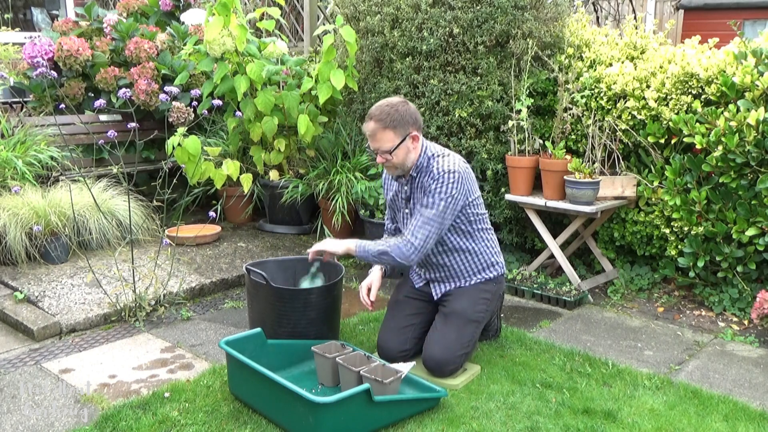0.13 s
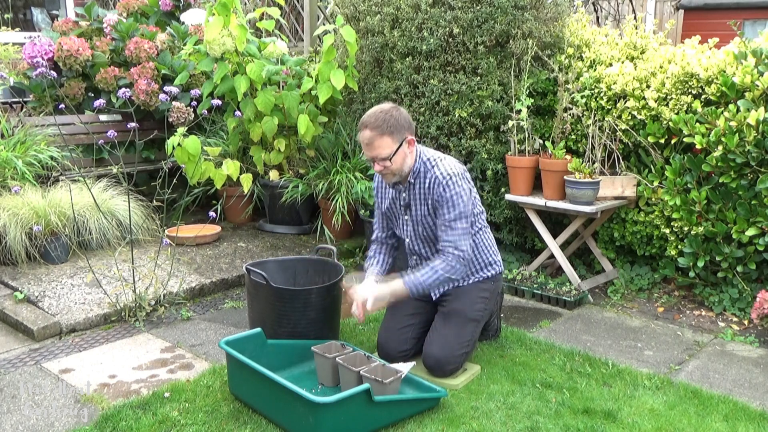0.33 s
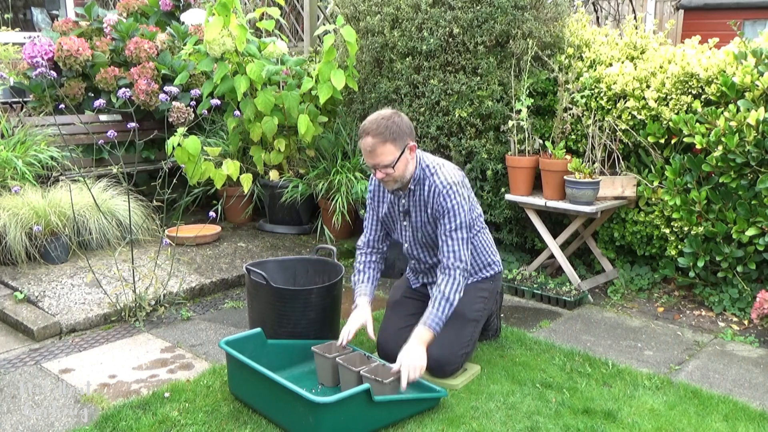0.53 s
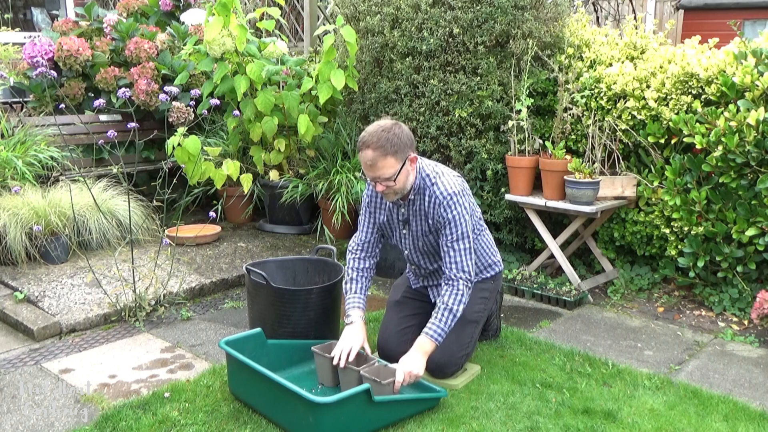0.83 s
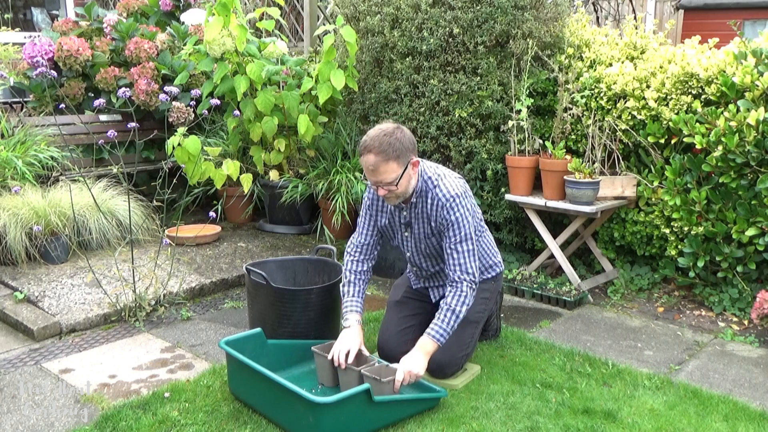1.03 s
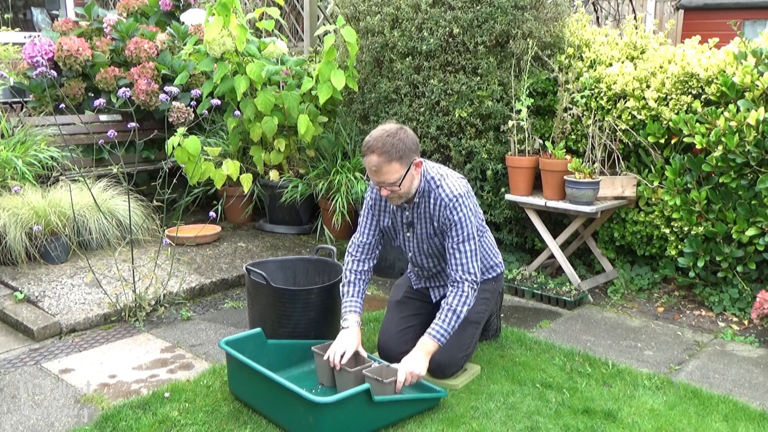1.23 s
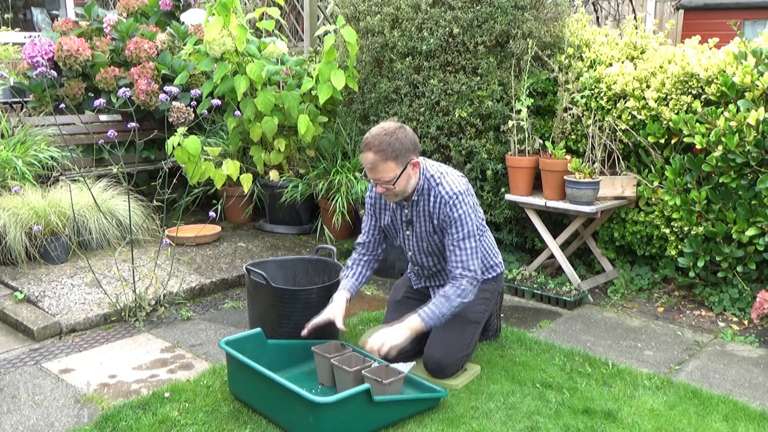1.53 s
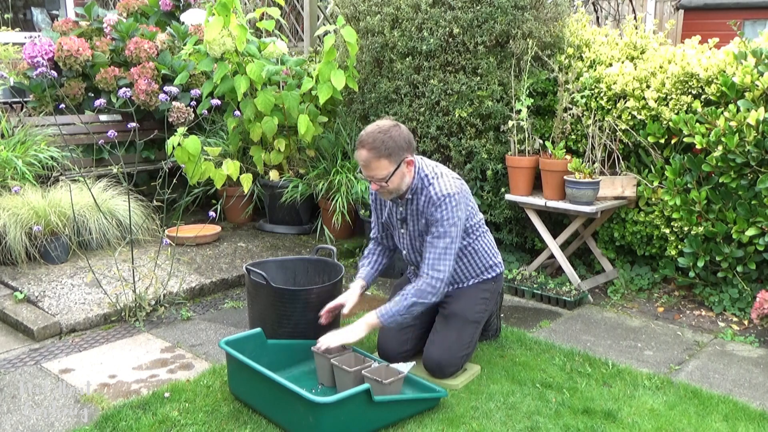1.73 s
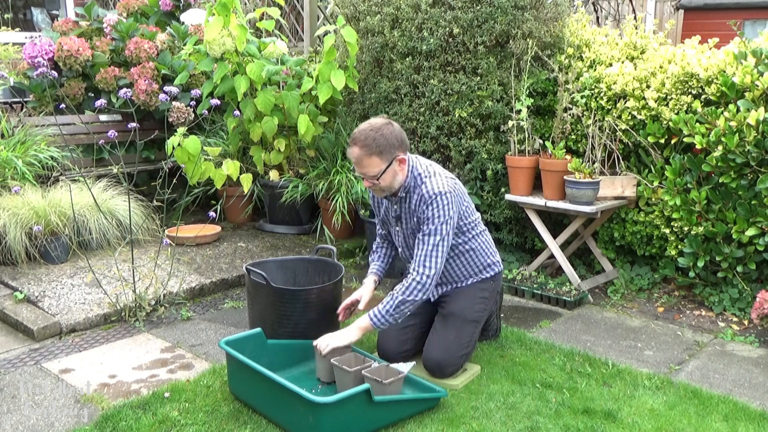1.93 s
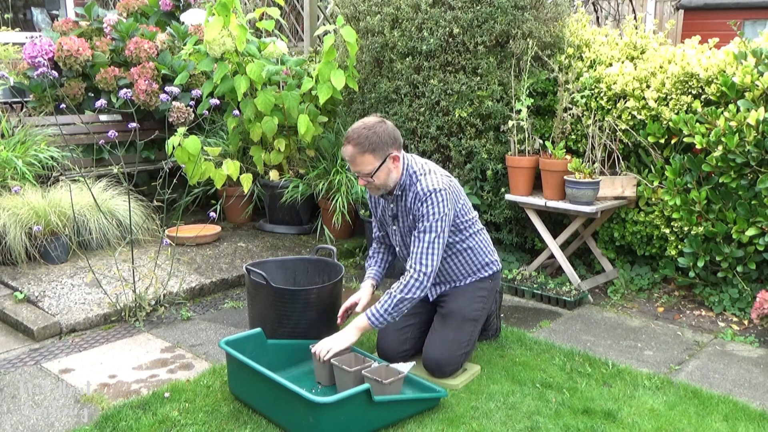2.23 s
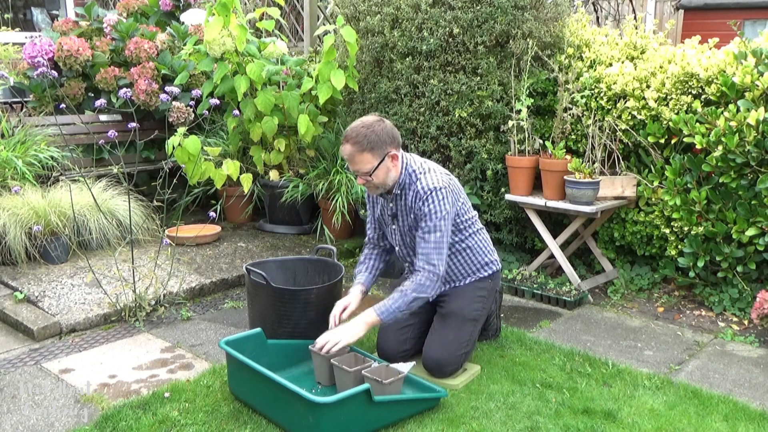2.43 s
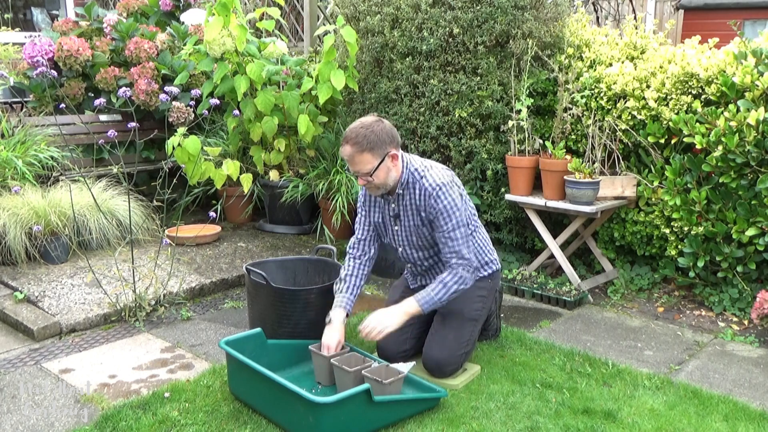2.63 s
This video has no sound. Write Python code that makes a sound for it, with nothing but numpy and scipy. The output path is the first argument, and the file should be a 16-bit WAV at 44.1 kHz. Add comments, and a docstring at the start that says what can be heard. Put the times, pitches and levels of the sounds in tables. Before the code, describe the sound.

Small plastic pots of compost knock and scrape together in a plastic tray in a quiet garden

```python
"""Potting in a quiet garden

A scoop flicks off the last compost and drops into a plastic tray, then small pots of compost are shuffled
together, set down and tapped. Gritty scrapes are filtered noise and tiny ticks, rim clicks are short
bursts of noise, and hollow knocks are sums of dying tones. Air rumbles and leaves hiss faintly, both as
filtered noise. A close mono microphone overloads on the sharpest blows.
"""
import sys
import numpy as np
from scipy import signal
from scipy.fft import rfft, irfft, next_fast_len
from scipy.io import wavfile
from scipy.ndimage import map_coordinates

SR = 44100
rng = np.random.default_rng(int(sys.argv[2]) if len(sys.argv) > 2 else 0)


def store_pcm(level_fs):
    """Save levels as 16-bit WAV."""
    pcm = np.round(np.clip(level_fs, -1, 1) * 32767).astype(np.int16)
    wavfile.write(sys.argv[1], SR, np.atleast_2d(pcm).T)


N = 123479

# Loudness of the air rumble and of the leaves, before their small random wobble: t/s, level/dB
AIR_LEVEL = [(0, -32.5), (.35, -31), (.7, -34), (1.5, -37), (2.2, -37.5), (2.8, -38)]
LEAVES_LEVEL = [(0, -45.5), (.18, -40), (.32, -38.5), (.49, -45.5), (1.0, -39.5), (1.45, -50), (2.33, -48),
                (2.8, -47.5)]
# Pots knocking on the tray: t/s, level/dB, centre f/Hz of the contact, ring length/factor
POT_KNOCKS = [(.232, -16.5, 140, 0.66), (.628, -21.5, 258, 1.36), (.7235, -0.5, 354, 1.03),
              (.7775, 1, 330, 0.52), (.8850, -2, 323, 1.06), (.8935, -5, 252, 0.68),
              (.906, -17.5, 120, 0.85), (1.0195, -4, 850, .9), (1.0245, -5, 364, 1.2), (1.1420, -4, 510, 1),
              (1.152, -9, 600, 0.68), (1.2875, -9.5, 413, 0.8), (1.3685, -17.5, 360, 1.4),
              (1.9955, -8, 530, 1.3), (2.003, -13, 160, 1.36), (2.010, -12, 400, .9),
              (2.027, -7, 450, 0.77), (2.033, -3.5, 477, 0.82), (2.091, -19, 805, .6),
              (2.1635, -11, 340, 1.08), (2.2580, -6.5, 730, 0.85), (2.260, -15, 190, 0.86),
              (2.4055, -4, 790, 0.65), (2.5000, -11.5, 850, 0.84), (2.550, -13, 650, 0.58),
              (2.6935, -13.5, 510, 0.54), (2.698, -12.5, 220, 0.22)]
# The scoop landing and rocking in the tray: t/s, level/dB, centre f/Hz of the contact, ring length/factor
SCOOP_DROPS = [(.3992, 5, 565, 0.6), (.410, -7, 393, 0.93), (.428, -11.5, 220, 1.05),
               (.439, -17, 105, 0.91), (.4545, -5, 580, 0.8), (.468, -14.5, 494, 0.86)]
# Ringing tones (modes) of each shell, before each blow shifts and scales them:
# f/Hz, relative level/dB, time to fall 60 dB/s
POT_MODES = [(97, -21.5, 0.17), (172, -8, 0.12), (228.5, -7.5, 0.069), (292.4, -7, 0.067),
             (362.3, 1, 0.062), (423, -4.5, 0.073), (528, -4.5, 0.046), (678, -1, 0.032), (772, 3, 0.035),
             (928, -7.5, 0.073), (1038, -21.5, 0.021)]
TRAY_MODES = [(114, -8.5, 0.15), (209, -0.5, 0.092), (257, -0.5, 0.13), (330, 0, 0.072), (492, -7.5, 0.092),
              (585, -0.5, 0.059), (643, -2.5, 0.052), (870, -1, 0.032), (1410, 2, 0.044)]
# Scrapes of gritty plastic: t/s, rise/s, hold/s, time to fall 60 dB/s, grit level/dB,
# hollow body level/dB, brightness of the grit/dB per octave
SCRAPE_STROKES = [(0.322, 0.0044, 0.0024, 0.017, -14, -28.5, -2.5),
                  (0.329, 0.004, 0.0058, 0.086, -20, -30.5, 1),
                  (0.412, 0.015, 0.014, 0.12, -30.5, -33.5, -5), (.711, 0.012, 0.014, 0.19, -18, -15, -1.5),
                  (0.756, 0.0055, 0.014, 0.056, -25.5, -34, -1),
                  (0.792, 0.017, 0.023, 0.08, -22.5, -22.5, 1), (0.858, 0.019, 0.028, 0.32, -29, -26.5, -1),
                  (1.006, 0.011, 0.014, 0.1, -15, -15.5, 1), (1.067, 0.011, 0.02, 0.44, -29.5, -26.5, 1.5),
                  (1.139, 0.013, 0.03, 0.37, -19, -26, 2.5), (1.206, 0.0065, 0.011, 0.14, -19.5, -23, 2.5),
                  (1.243, 0.0073, 0.0091, 0.13, -17, -23, 2), (1.278, 0.0062, 0.023, 0.11, -23, -25.5, 3),
                  (1.316, 0.0039, 0.012, 0.25, -34.5, -22, 3.5),
                  (1.476, 0.0027, 0.02, 0.21, -42.5, -37, 4.5),
                  (1.928, 0.0029, 0.015, 0.22, -30, -28.5, 1.5),
                  (1.992, 0.0033, 0.019, 0.18, -28.5, -21, 2), (2.058, 0.0093, .025, 0.44, -40, -45, 5),
                  (2.134, 0.0044, 0.029, 0.071, -26.5, -24.5, 6),
                  (2.189, .008, 0.012, .08, -36.5, -42, 1.5), (2.247, 0.0061, 0.0034, 0.1, -21, -18.5, 2),
                  (2.36, 0.0086, .006, 0.038, -38, -29, 2), (2.387, .015, 0.0066, 0.058, -33, -24, -6),
                  (2.501, 0.0078, 0.03, 0.17, -41, -32, 1)]
# Clicks of pot rims and grit: t/s, level/dB, f/Hz, time to fall 60 dB/s
RIM_CLICKS = [(.3990, -3, 3940, 0.011), (0.4010, -6, 1200, 0.013), (.4540, -20, 1640, 0.034),
              (0.8849, -5, 3800, 0.02), (0.9318, -21.5, 5700, 0.012), (0.9533, -19.5, 6000, 0.011),
              (.9720, -22, 5970, 0.021), (.9990, -18.5, 7200, 0.0064), (1.039, -14, 6000, 0.01),
              (1.1411, -5.5, 5300, 0.029), (1.1437, -9.5, 2000, 0.021), (1.168, -19, 5500, 0.016),
              (1.2859, -2.5, 5000, 0.015), (1.297, -12, 6000, 0.01), (1.321, -16, 5000, .014),
              (1.328, -15, 6000, 0.014), (1.352, -16, 3460, 0.029), (1.3675, -6.5, 8700, 0.013),
              (1.3683, -13, 1430, 0.018), (1.393, -26, 6050, 0.02), (1.448, -30, 6200, 0.023),
              (1.9871, -11.5, 8600, 0.018), (1.9980, -6, 1510, 0.027), (2.1091, -12.5, 12400, 0.0056),
              (2.1367, -8, 6000, 0.021), (2.2187, -22.5, 7500, 0.0089), (2.258, -7, 2930, 0.022),
              (2.356, -32, 5000, 0.0073), (2.3981, -14, 5500, 0.0092), (2.405, -13, 3940, 0.021),
              (2.463, -27.5, 2480, 0.014), (2.4995, -11, 2980, 0.026), (2.51, -19, 5000, 0.019),
              (2.532, -22.5, 4600, 0.013), (2.5498, -19.5, 4600, 0.016)]
# Tone colours of rumble, hiss, grit, hollow pot and rim: f/Hz, relative level/dB
RUMBLE_COLOUR = [(12, -30), (22, -2), (60, -2), (271, -11), (390, -17), (572, -15.5), (1140, -20.5),
                 (2500, -41.5), (5500, -120)]
HISS_COLOUR = [(400, -2), (1500, 6), (3000, 0), (6000, -4), (12000, -6.5), (14500, -10), (16000, -32)]
GRIT_COLOUR = [(300, -34), (800, -0.5), (1400, -1.5), (2300, 2.5), (3000, -1.5), (4100, 2), (6500, -1.5),
               (9500, -5), (13500, -9), (16000, -23)]
HOLLOW_COLOUR = [(80, -35.5), (220, -10.5), (360, 2), (530, -8), (790, -2), (1100, -14), (1500, -23.5),
                 (4000, -51)]
RIM_COLOUR = [(150, -20), (400, 20.5), (900, 11.5), (1400, 1), (2300, 3), (3000, -3), (4000, 2.5),
              (6500, -4), (10000, -3.5), (14000, -6), (16000, -26)]

KNOCK_OCTAVES, KNOCK_RISE_S = 0.67, 0.00097  # width of a contact's spectrum, time constant of its onset
MODE_SCATTER_DB = 2
CONTACT_HZ = 413  # a contact here leaves the modes at their own pitch, apart from random scatter
STIFFENING = 0.044  # octaves that the modes rise for each octave of contact pitch
WALLS_DB, WALLS_S = -15, 0.1  # level of the answer, time to fall 60 dB
GRAINS_PER_S, GRAIN_SPREAD_DB, SMOOTH_SHARE = 3500, 3, 0.56
CRUMBS_PER_S, CRUMB_CYCLES, CRUMB_SHARE = 1500, 3, 0.77
CRUMB_LOW_HZ, CRUMB_HIGH_HZ = 1460, 14020
STICK_PER_S, STICK_DB = 165.5, 2  # uneven sliding: random points a second, size
PATCH_DB = 2  # each place of contact colours the sound differently
CLICK_OCTAVES = 1.34  # width of a low click's spectrum
SMALL_HZ = 10900  # clicks narrow as they rise; at this pitch, that of tiny grit, they are half as wide
CLICK_TAIL_DB, CLICK_TAIL_S = -59, 0.068  # faint rattle: starting level, time to fall 60 dB
CEILING = 1.05  # level that the rounded peaks approach
TOP_HZ = 15900  # the treble is cut steeply around here


def amp(db):
    """Turn decibels into gain."""
    return 10 ** (np.asarray(db) / 20)


def unit(x):
    """Scale x to an average (rms) level of 1."""
    return x / np.sqrt(np.mean(x ** 2) + 1e-20)


def along(points, hz):
    """Read a curve of (Hz, value) points on a log frequency axis."""
    f, v = np.transpose(points)
    return np.interp(np.log(hz + 1), np.log(f + 1), v)


def curve(points):
    """Join (s, value) points by straight lines, one value per sample."""
    return np.interp(np.arange(N) / SR, *np.transpose(points))


def wobble(rate, size):
    """Draw a smooth random curve through `rate` random points a second."""
    knots = rng.standard_normal(1024)
    return map_coordinates(knots, [np.arange(size) * rate / SR], mode="wrap")


def colour(x, db_at):
    """Filter x by a gain in dB for each frequency, without sounding ahead of time."""
    m = 2 * next_fast_len(len(x) // 2 + 2048)
    gain = np.maximum(amp(db_at(np.fft.rfftfreq(m, 1 / SR))), 1e-6)
    # Folding the cepstrum forward in time gives a minimum-phase filter.
    cepstrum = irfft(np.log(gain))
    cepstrum[1:m // 2] *= 2
    cepstrum[m // 2 + 1:] = 0
    return irfft(rfft(x, m) * np.exp(rfft(cepstrum)))[:len(x)]


def contact_db(hz, centre_hz, octaves, steep_db=24):
    """Give the hump of frequencies, in dB, that a contact excites."""
    distance = np.log2((hz + 1) / centre_hz) / octaves
    return -steep_db * np.log10(1 + distance ** 2)


def add(track, s, sound):
    """Mix a sound into the track at a time in seconds."""
    part = track[max(round(s * SR), 0):][:len(sound)]
    part += sound[:len(part)]


def garden():
    """Low outdoor rumble and a faint leafy hiss: filtered noise that swells and sinks."""
    rumble = unit(colour(rng.standard_normal(N), lambda hz: along(RUMBLE_COLOUR, hz)))
    hiss = unit(colour(rng.standard_normal(N), lambda hz: along(HISS_COLOUR, hz)))
    air = rumble * amp(curve(AIR_LEVEL) + 1.4 * wobble(14, N))
    leaves = hiss * amp(curve(LEAVES_LEVEL) + 0.94 * wobble(25.3, N))
    return air + leaves


def knocks(blows, modes):
    """Each blow starts a shell's dying tones together; a harder contact stiffens the wall and raises them."""
    out, t = np.zeros(N), np.arange(SR // 5) / SR
    hz, level, t60 = np.transpose(modes)[:, :, None]  # one row per mode
    for s, db, centre_hz, length in blows:
        scatter_db = MODE_SCATTER_DB * rng.standard_normal(hz.shape)
        gain = amp(level + contact_db(hz, centre_hz, KNOCK_OCTAVES) + scatter_db)
        stiffer = (centre_hz / CONTACT_HZ) ** STIFFENING
        pitch = hz * stiffer * (1 + 0.029 * rng.standard_normal(hz.shape))
        ring = gain * np.cos(2 * np.pi * pitch * t) * amp(-60 * t / (t60 * length))
        shell = ring.sum(0)
        # Even out the strength, however the modes happen to add up.
        shell = shell * np.linalg.norm(ring) / np.linalg.norm(shell) / np.linalg.norm(gain)
        onset = 1 - np.exp(-t / KNOCK_RISE_S)
        add(out, s, amp(db) * shell * onset)
    return out


def walls(x):
    """Paving, fence and hedge scatter a brief weak answer: x smeared by fading noise."""
    t = np.arange(SR // 4) / SR
    fading = rng.standard_normal(len(t)) * amp(-60 * t / WALLS_S)
    tail = colour(fading, lambda hz: along([(800, -3), (10000, -4.5)], hz))
    return signal.fftconvolve(x, tail / np.linalg.norm(tail))[:N]


def grains(size):
    """Countless tiny slips of uneven size over a smooth rub."""
    slips = (rng.random(size) < GRAINS_PER_S / SR) * rng.choice([-1, 1], size)
    sizes = amp(GRAIN_SPREAD_DB * np.minimum(rng.exponential(size=size), 4))
    rub = SMOOTH_SHARE * rng.standard_normal(size)
    return unit(unit(slips * sizes) + rub)


def crumbs(size):
    """Separate crumbs, each a tick of a few cycles at its own pitch."""
    count = int(CRUMBS_PER_S * size / SR)
    when, pitch, strength = rng.random((count, 3)).T[:, :, None]
    n = np.arange(SR // 300)
    hz = CRUMB_LOW_HZ + (CRUMB_HIGH_HZ - CRUMB_LOW_HZ) * pitch
    cycles = hz * n / SR
    ticks = np.sin(2 * np.pi * cycles) * np.exp(-cycles / CRUMB_CYCLES)
    ticks = ticks * np.sqrt(pitch + .1)  # higher ticks are stronger
    ticks = ticks * amp(-GRAIN_SPREAD_DB * np.log(strength + 0.0067))
    places = (when * size).astype(int) + n
    return unit(np.bincount(places.ravel(), ticks.ravel(), size)[:size])


def patches(hz):
    """The random colour of one place of contact: a ripple in dB over frequency."""
    return PATCH_DB * map_coordinates(rng.standard_normal(128), [np.sqrt(hz) / 3], mode="wrap")


def scrapes():
    """Compost grinds between plastic walls: bright grit, and the pot's hollow answer."""
    out, t = np.zeros(N), np.arange(SR // 3) / SR
    for s, rise, hold, fall, grit_db, body_db, tilt in SCRAPE_STROKES:
        def grit_colour(hz):
            """Grit, place of contact and brightness together, in dB."""
            return along(GRIT_COLOUR, hz) + patches(hz) + tilt * np.log2((hz + 1) / 4000)

        fade_db = -60 * np.maximum(t - rise - hold, 0) / fall
        stroke = np.minimum(t / rise, 1) * amp(fade_db + STICK_DB * wobble(STICK_PER_S, len(t)))
        rubbing = grains(len(t)) + CRUMB_SHARE * crumbs(len(t))
        grit = unit(colour(rubbing, grit_colour))
        body = unit(colour(grains(len(t)), lambda hz: along(HOLLOW_COLOUR, hz)))
        add(out, s, stroke * (amp(grit_db) * grit + amp(body_db) * body))
    return out


def clicks():
    """Thin rims snap past each other: a noisy crack and faint rattle; the smallest tick only in the treble."""
    out, t = np.zeros(N), np.arange(SR // 8) / SR
    for s, db, pitch_hz, t60 in RIM_CLICKS:
        octaves = CLICK_OCTAVES / (1 + (pitch_hz / SMALL_HZ) ** 4)

        def rim_colour(hz):
            """Rim, place of contact and click pitch together, in dB."""
            hump = contact_db(hz, pitch_hz, octaves, steep_db=19)
            return along(RIM_COLOUR, hz) + patches(hz) + hump

        dying = amp(-60 * t / t60) + amp(CLICK_TAIL_DB - 60 * t / CLICK_TAIL_S)
        crack = colour(dying * rng.standard_normal(len(t)), rim_colour)
        add(out, s, amp(db) * crack * np.linalg.norm(dying) / np.linalg.norm(crack))
    return out


def scene():
    """Mix the handling, its answer from the walls and the garden, alike in both channels."""
    blows = knocks(POT_KNOCKS, POT_MODES) + knocks(SCOOP_DROPS, TRAY_MODES)
    handling = blows + scrapes() + clicks()
    mono = garden() + handling + amp(WALLS_DB) * walls(handling)
    return np.array([mono, mono])


def record(dry):
    """The microphone overloads: strong peaks are rounded off, then the highest treble is cut steeply."""
    rounded = dry / (1 + np.abs(dry / CEILING) ** 6) ** (1 / 6)
    m = next_fast_len(N + SR // 4)
    treble_cut = 1 + (np.fft.rfftfreq(m, 1 / SR) / TOP_HZ) ** 120
    return irfft(rfft(rounded, m) / treble_cut, m)[:, :N]


dry = scene()
out = record(dry)
store_pcm(out)
```